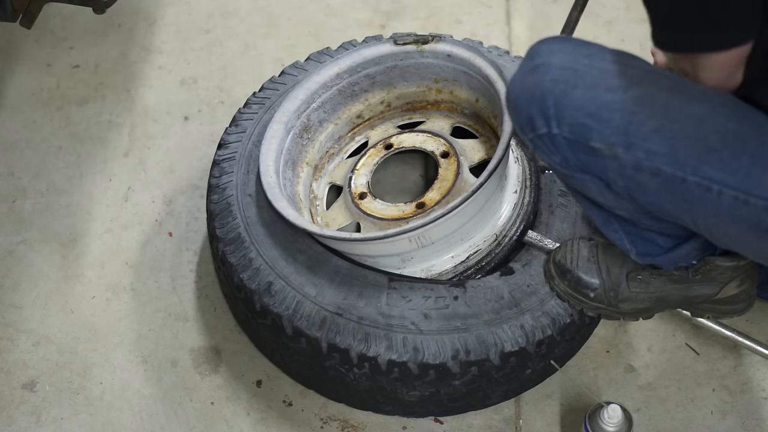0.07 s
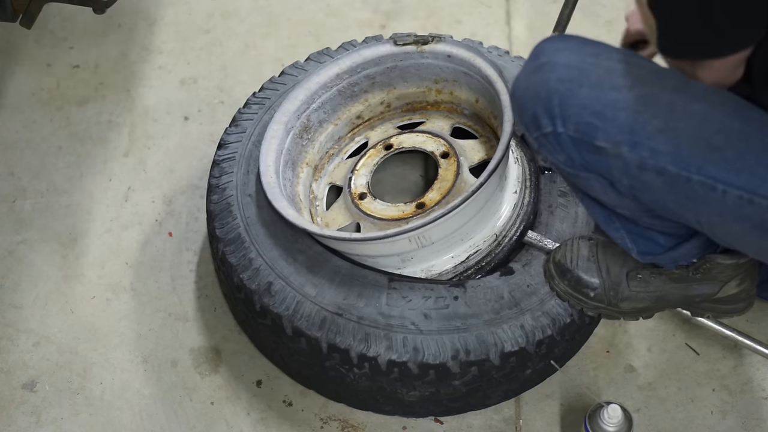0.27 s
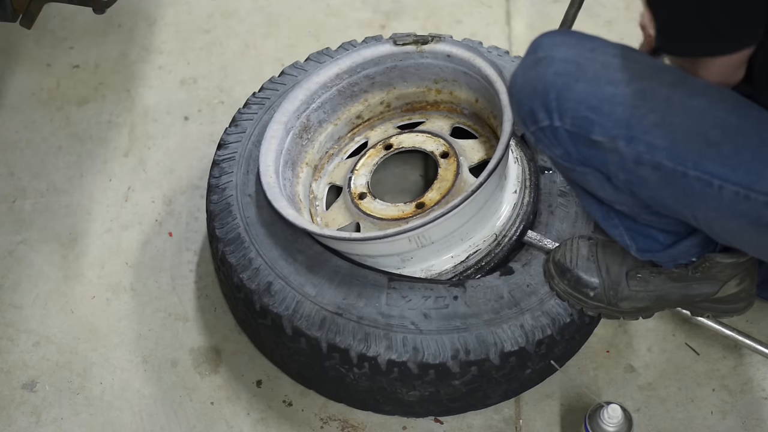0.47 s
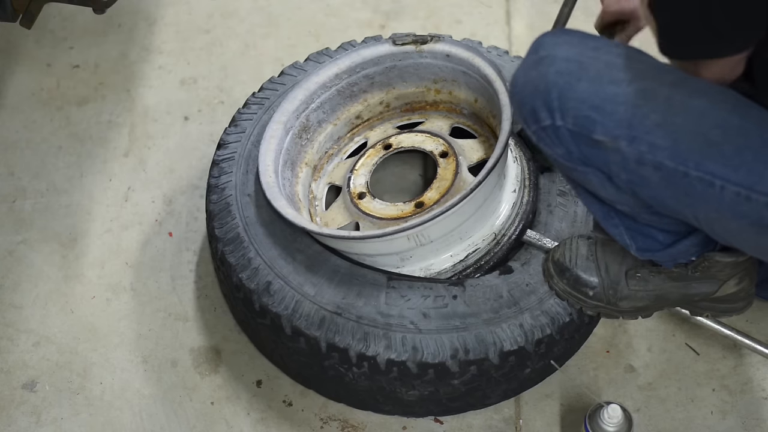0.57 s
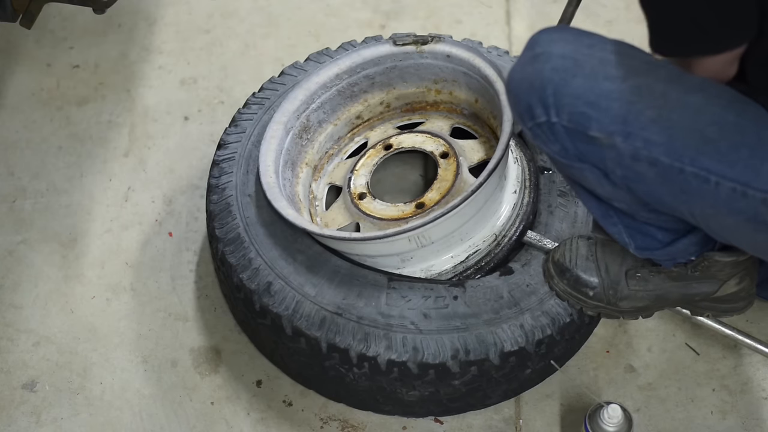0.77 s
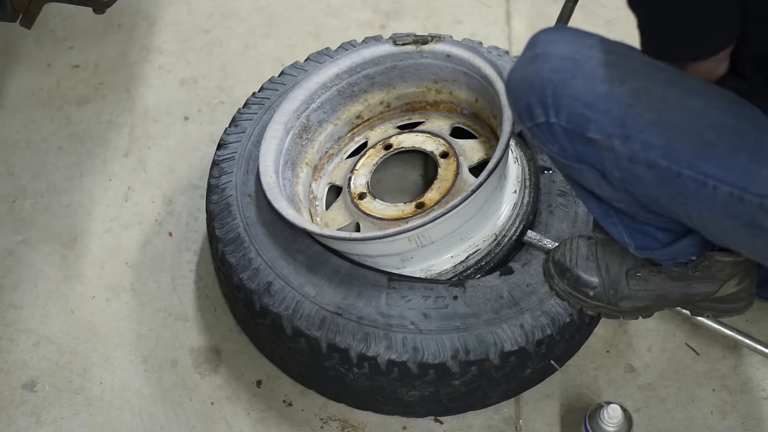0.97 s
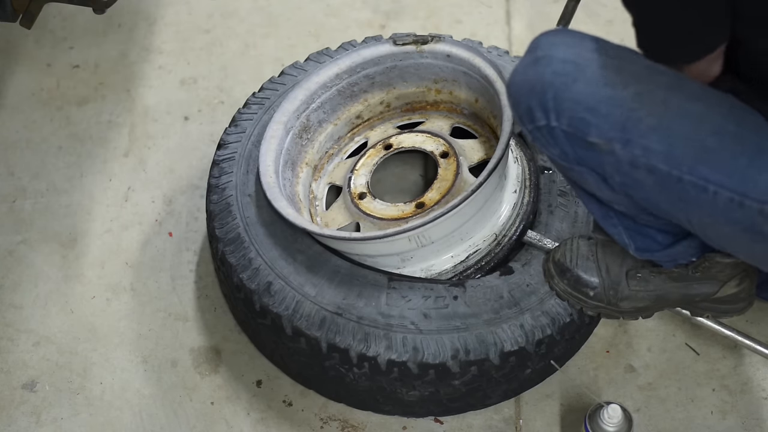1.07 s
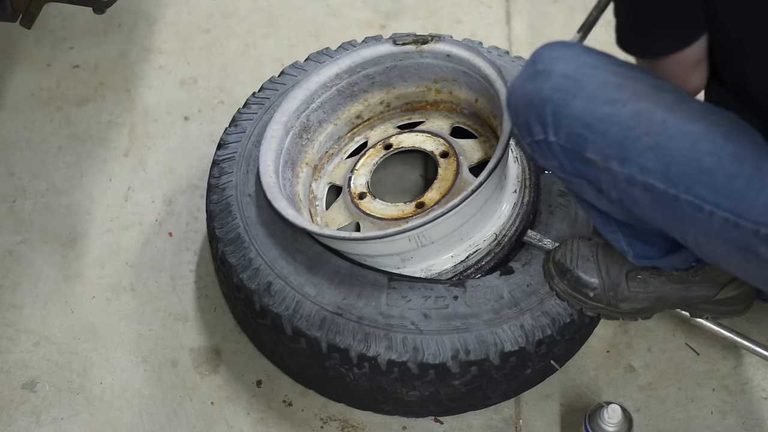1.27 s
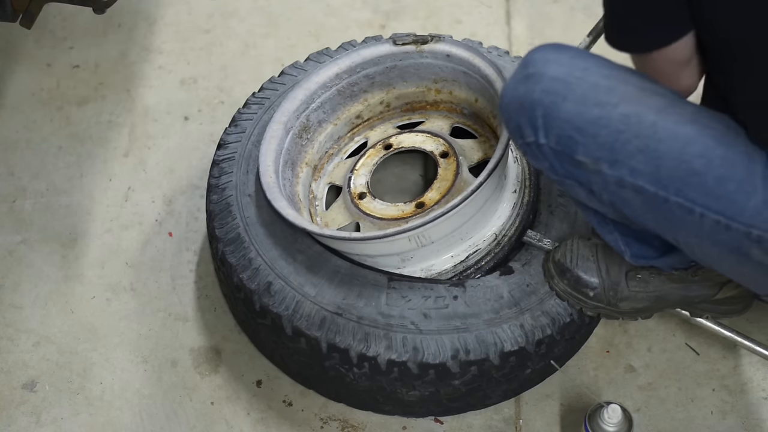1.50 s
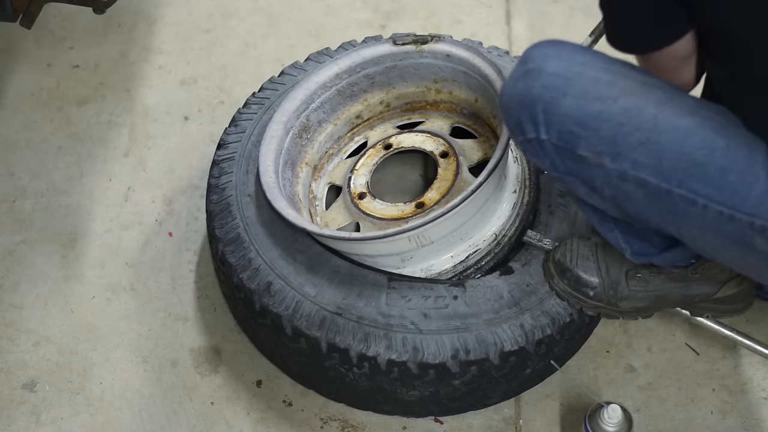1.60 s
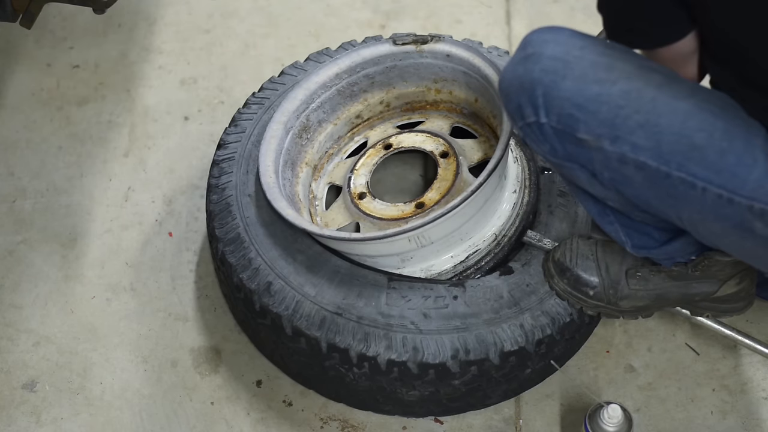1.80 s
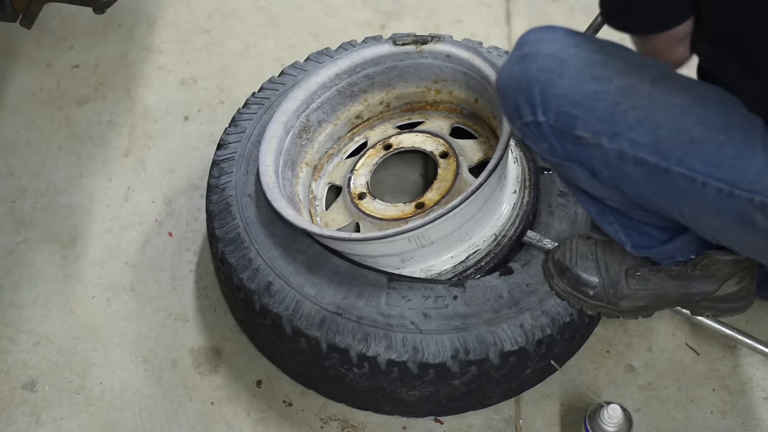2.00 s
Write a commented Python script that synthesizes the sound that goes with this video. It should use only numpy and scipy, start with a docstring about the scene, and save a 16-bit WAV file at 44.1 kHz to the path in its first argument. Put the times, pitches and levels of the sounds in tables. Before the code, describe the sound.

Two sharp, slightly distorted clanks of a tool on a steel wheel rim ring through a garage, close to the microphone. Thin lever squeaks, a dull tyre thud and a light metal knock follow over a soft rubber rumble.

```python
"""Over the still air of a hard-walled garage, clothes rustle faintly and a tyre lever squeaks as it slips.
A steel tool then strikes the wheel rim twice; the tyre damps the steel and the room carries the clank on.
The blows overload a limiter, which ducks and then lets the echo swell back.
More squeaks follow, then a dull thud against the tyre and a lighter knock of the lever,
while the rubber rumbles softly under the worker's weight."""
import sys
import numpy as np
from scipy import signal
from scipy.fft import rfft, irfft
from scipy.io import wavfile
from scipy.ndimage import uniform_filter1d

SR = 44100
rng = np.random.default_rng(int(sys.argv[2]) if len(sys.argv) > 2 else 0)


def file_out(sig):
    """Save sig as 16-bit WAV at sys.argv[1]."""
    # one column per channel
    cols = np.atleast_2d(sig).T
    # limit, then scale
    lim = np.clip(cols, -1, 1)
    pcm = np.round(lim * 32767).astype(np.int16)
    wavfile.write(sys.argv[1], SR, pcm)


N = 90404
TIME, BIN_HZ = np.arange(N) / SR, np.fft.rfftfreq(N, 1 / SR)


def amp(db):
    """Decibels to gain."""
    return 10 ** (np.asarray(db) / 20)


def unit_rms(x):
    """Scale to unit rms."""
    return x / np.sqrt(np.mean(x ** 2) + 1e-20)


def at_hz(curve, hz):
    """Read a curve on a log-frequency axis."""
    freq_hz, value = np.transpose(curve)
    return np.interp(np.log(np.maximum(hz, 1)), np.log(freq_hz), value)


def decay(t60_s):
    """Exponential fade from time zero."""
    return np.exp(-np.log(1000) * TIME / t60_s)


def swell(start_s, length_s):
    """A rounded rise and fall."""
    return np.sin(np.pi * np.clip((TIME - start_s) / length_s, 0, 1))


def place(start_s, x):
    """Delay a sound to its cue."""
    return np.concatenate([np.zeros(int(start_s * SR)), x])[:N]


def noise(colour):
    """Coloured noise of unit rms."""
    return unit_rms(irfft(rfft(rng.standard_normal(N)) * amp(at_hz(colour, BIN_HZ)), N))


def drift(rate_hz):
    """Smooth random wander of unit spread."""
    lowpass = signal.butter(2, rate_hz, fs=SR, output="sos")
    return unit_rms(signal.sosfilt(lowpass, rng.standard_normal(N)))


def ring(pitch_hz, level_db, t60_s):
    """One struck mode of random polarity, played until it is inaudible."""
    envelope = amp(level_db) * decay(t60_s) * (TIME < 2 * t60_s)
    return rng.choice([-1, 1]) * envelope * np.sin(2 * np.pi * pitch_hz * TIME)


def soft_contact(colour):
    """A coloured click of unit energy, spread over a moment by an all-pass."""
    cepstrum = irfft(np.log(amp(at_hz(colour, BIN_HZ))), N)
    cepstrum[1:N // 2] *= 2  # minimum phase packs the energy into the attack
    cepstrum[N // 2 + 1:] = 0
    click = irfft(np.exp(rfft(cepstrum)), N)
    _, poles = signal.iirpeak(1526, Q=0.54, fs=SR)
    return signal.lfilter(poles[::-1], poles, click / np.linalg.norm(click))


# Reverb time of the garage: freq_hz, base_t60_s
GARAGE_DECAY = [(100, 1), (400, 0.58), (1000, 0.62), (2200, 0.58), (3600, 0.58), (6500, 0.53), (9000, 0.6),
                (15000, 0.29)]
def in_garage(x, wet_db, tail_scale=1):
    """Hard walls add dense early echoes and a diffuse tail that dies at its own rate in each band."""
    white = rfft(rng.standard_normal(N))
    edges_hz = np.geomspace(20, SR / 2, 22)
    tail = 0
    for low, high in zip(edges_hz, edges_hz[1:]):
        band = irfft(white * ((BIN_HZ >= low) & (BIN_HZ < high)), N)
        tail += band * decay(tail_scale * at_hz(GARAGE_DECAY, np.sqrt(low * high)))
    early = amp(3) * rng.standard_normal(N) * decay(t60_s=0.26)
    response = rfft(tail + early)
    colour = np.sqrt(uniform_filter1d(np.abs(response) ** 2, size=int(40 * N / SR)))  # 40 Hz wide
    even_response = irfft(response / colour, N)[:N // 2]
    echoes = place(0.0032, even_response)  # pre-delay
    return x + amp(wet_db) * signal.fftconvolve(x, echoes / np.linalg.norm(echoes))[:N]


# Tone of the still air: freq_hz, gain_db
AIR_COLOUR = [(20, -13), (45, -7.5), (75, -0.5), (170, 1.5), (300, -7.5), (800, -8.5), (1600, -16),
              (4000, -19.5), (9000, -24.5), (15500, -29)]
def room_tone():
    """The garage air lays a faint, low bed under everything."""
    return amp(-51.5) * noise(AIR_COLOUR)


# Strokes of clothing: start_s, length_s, level_db
CLOTH_STROKES = [(.04, 0.066, -64.5), (1.432, .05, -49.5), (1.466, 0.078, -52.5), (1.96, 0.074, -52)]
# Hiss of the fabric: freq_hz, gain_db
CLOTH_COLOUR = [(500, -8.5), (2400, -9), (3600, -0.5), (4800, -4), (7000, 2.5), (10000, -3.5), (16000, -13)]
def clothes_rustle():
    """Cloth brushes in short, rough strokes."""
    strokes = sum(amp(db) * swell(start_s, length_s) for start_s, length_s, db in CLOTH_STROKES)
    grain = amp(4.5 * drift(rate_hz=150))
    return in_garage(noise(CLOTH_COLOUR) * grain * strokes, wet_db=-3)


# Slips of the lever: start_s, length_s, level_db, start_pitch_hz, end_pitch_hz, octave_gain_db
LEVER_SLIPS = [(0.135, 0.1, -55, 4380, 4214, -22), (0.219, 0.041, -49, 4860, 5200, -28),
               (0.93, 0.073, -45, 3680, 3660, 1), (0.993, 0.064, -36.5, 4130, 4190, -11.5),
               (1.03, 0.073, -36.5, 3684, 3956, -5.5), (1.02, .09, -54, 4870, 4840, -27)]
# Friction noise under each squeak: freq_hz, gain_db
SCRAPE_COLOUR = [(300, -11), (1500, 1), (3500, 3), (7000, -1), (10000, -14.5), (16000, -26.5)]
def lever_squeaks(waver_depth=0.026, waver_hz=145.4):
    """Steel slips on steel: an unsteady tone with its octave, over a light scrape."""
    scrape = amp(-18.5) * noise(SCRAPE_COLOUR)
    squeaks = 0
    for start_s, length_s, level_db, start_hz, end_hz, octave_db in LEVER_SLIPS:
        glide_hz = np.interp(TIME, [start_s, start_s + length_s], [start_hz, end_hz])
        pitch_hz = glide_hz * (1 + waver_depth * drift(waver_hz))
        phase = 2 * np.pi * np.cumsum(pitch_hz) / SR
        tone = np.sin(phase) + amp(octave_db) * np.sin(2 * phase)
        squeaks += amp(level_db) * swell(start_s, length_s) * (tone + scrape)
    return in_garage(squeaks, wet_db=4)


# Shifts of weight on the tyre: start_s, length_s, level_db
TYRE_SHIFTS = [(0.195, 0.063, -51), (1.04, 0.28, -50), (1.293, 0.55, -44), (1.766, 0.048, -50),
               (1.8, 0.28, -51)]
# Rumble of the rubber: freq_hz, gain_db
RUBBER_COLOUR = [(30, -12), (75, 0), (160, 0.5), (300, -3.5), (1000, -11.5), (3000, -18), (10000, -38)]
def tyre_rumble():
    """The tyre rumbles softly as it shifts under the worker's weight."""
    shifts = sum(amp(db) * swell(start_s, length_s) for start_s, length_s, db in TYRE_SHIFTS)
    return noise(RUBBER_COLOUR) * shifts


# Modes of rim and tool: pitch_hz, first_blow_gain_db, second_blow_gain_db, base_t60_s
STEEL_MODES = [(314, -26, -29, 0.51), (509.8, -27.5, -32, 0.61), (1399, -9.5, -11, 0.11),
               (1646, -8.5, -3.5, 0.11), (2428, 3, 4, 0.039), (2487, -9, -0.5, 0.14),
               (2888, -14.5, -9, .08), (3360, -13.5, -7.5, 0.1), (3524, 4.5, 4.5, 0.06),
               (3627, 5, 4, 0.069), (3618, 2, 2.5, 0.13), (3740, -6, 6, 0.072), (4743, 5, -1, 0.085),
               (4800, -10, 0, 0.055), (5230, 3, 6, 0.055), (5610, -2, -2, 0.15), (5686, -4, -0.5, 0.047),
               (6137, -10.5, 7, 0.0686), (6600, 13.5, -20, 0.061), (7530, -1, -7, 0.038),
               (7660, -8.5, 2.5, .06), (7780, -11.5, 1, .05), (8356, 1, -2.5, .05), (8230, -4, -12, .05),
               (10280, -32, -11, 0.15), (10780, -9.5, -15.5, 0.11), (11830, -9.5, -16, 0.12)]
# Wash of dense, short-lived modes between them: freq_hz, gain_db
CLASH_COLOUR = [(100, -17), (300, -18), (650, -16.5), (950, -20.5), (1450, -2.5), (1720, 0), (1900, -9.5),
                (2150, -6), (2400, -0.5), (3050, -11), (3500, 7.5), (4300, -5), (5400, 4.5), (7000, -2.5),
                (8200, -1.5), (10000, -12.5), (13000, -15.5), (16000, -21.5)]
def struck_steel(blow, ring_scale, split_ratio=0.018):
    """Each blow lands on another spot and so favours other clusters of modes."""
    steel = amp(12) * noise(CLASH_COLOUR) * decay(0.049 * ring_scale)
    for pitch_hz, *gains_db, t60_s in STEEL_MODES:
        steel += ring(pitch_hz, gains_db[blow], t60_s * ring_scale)
        # the uneven rim splits each mode into close neighbours
        for detune in split_ratio * rng.uniform(0.46, 1, 2) * [-1, 1]:
            steel += ring(pitch_hz * (1 + detune), gains_db[blow] - 6, t60_s=0.04 * ring_scale)
    return steel


# Blows on the rim: start_s, steel_gain_db, ring_scale, thump_gain_db
RIM_BLOWS = [(.2339, 2.5, 0.7, 5), (.6085, -2, 1.4, -6)]
# Short, low thump of the overload as each blow clips: freq_hz, gain_db
OVERLOAD_THUMP_COLOUR = [(30, 7), (150, 0.5), (280, -6), (480, 2), (900, -22), (2000, -24.5), (8000, -50)]
def rim_clanks(radiates_above_hz=196):
    """The tool sets the steel ringing; a short, low overload thump is layered under each blow."""
    clanks, thumps = 0, 0
    for blow, (start_s, steel_db, ring_scale, thump_db) in enumerate(RIM_BLOWS):
        clanks += amp(steel_db) * place(start_s, struck_steel(blow, ring_scale))
        burst = noise(OVERLOAD_THUMP_COLOUR) * decay(t60_s=0.019)
        tone = ring(pitch_hz=479, level_db=0.81, t60_s=0.023)
        thumps += amp(thump_db) * place(start_s, burst + tone)
    low_cut = signal.butter(2, radiates_above_hz, "high", fs=SR, output="sos")
    return in_garage(signal.sosfilt(low_cut, clanks), wet_db=-4.5) + thumps


# Dull tone of the thud: freq_hz, gain_db
TYRE_THUD_COLOUR = [(50, -31.5), (130, -11), (240, -4.5), (600, -2.5), (1300, -2), (2300, -12),
                    (3200, -24.5), (5000, -37), (9000, -42.5), (16000, -54)]
def tyre_thud(start_s=1.2932):
    """One soft, dead contact with the tyre sets the room ringing."""
    thud = amp(5.66) * soft_contact(TYRE_THUD_COLOUR)
    return in_garage(place(start_s, thud), wet_db=7, tail_scale=0.84)


# Tone of the lever's knock and rattle: freq_hz, gain_db
LEVER_COLOUR = [(80, -31), (250, -4.5), (500, -1), (900, -4), (1800, 2.5), (2600, -0.5), (4000, -3.5),
                (5500, -17.5), (8000, -28.5), (16000, -44)]
# Modes of the lever: pitch_hz, level_db, t60_s
LEVER_MODES = [(1790, -18.5, 0.046), (1915, -37, .06), (2396, -22.5, 0.056), (2766, -29.5, 0.03),
               (3530, -19, 0.023)]
def lever_knock(start_s=1.5855):
    """The lever makes a lighter, harder contact with a brief rattle and ring."""
    contact = amp(0.5) * soft_contact(LEVER_COLOUR)
    rattle = amp(-26) * noise(LEVER_COLOUR) * decay(t60_s=0.16)
    modes = sum(ring(*mode) for mode in LEVER_MODES)
    return in_garage(place(start_s, contact + rattle + modes), wet_db=-2, tail_scale=0.69)


def scene():
    """The tool work up front, quiet movement and air behind it, in mono."""
    tool_work = rim_clanks() + lever_squeaks() + tyre_thud() + lever_knock()
    return (tool_work + clothes_rustle() + tyre_rumble() + room_tone())[None]


def lag(x, time_s):
    """One-pole smoothing."""
    pole = np.exp(-1 / (time_s * SR))
    return signal.lfilter([1 - pole], [1, -pole], x)


def record(dry):
    """The limiter reacts too late, so each blow clips before the gain ducks and recovers; the top is cut."""
    threshold_db, sense_s, attack_s, release_db_per_s = -4.5, 0.0035, 0.006, 103
    ceiling, high_cut_hz = 0.96, 15800
    level_db = 10 * np.log10(lag(dry[0] ** 2, sense_s) + 1e-12)
    over_db = np.maximum(level_db - threshold_db, 0)
    release_db = release_db_per_s * TIME
    duck_db = np.maximum.accumulate(over_db + release_db) - release_db  # catch each peak, then let go
    clipped = np.clip(dry * amp(-lag(duck_db, attack_s)), -ceiling, ceiling)
    high_cut = signal.ellip(10, 0.1, 80, high_cut_hz, fs=SR, output="sos")
    return signal.sosfilt(high_cut, clipped)


dry = scene()
out = record(dry)
file_out(out)
```